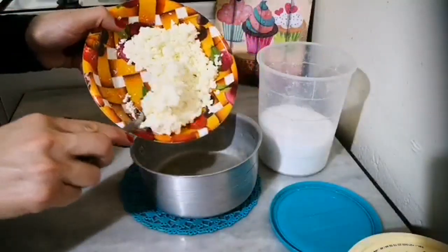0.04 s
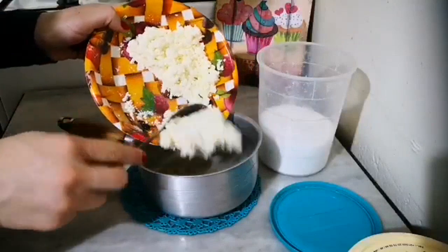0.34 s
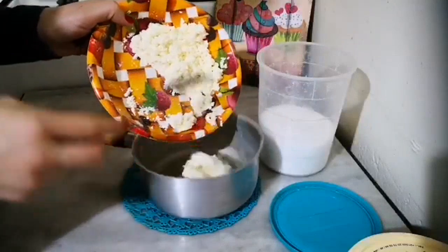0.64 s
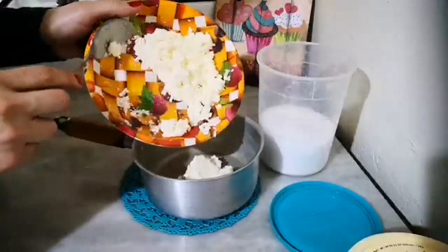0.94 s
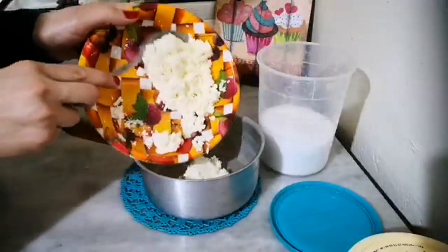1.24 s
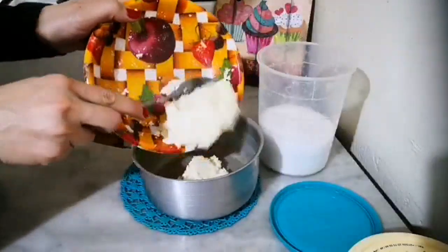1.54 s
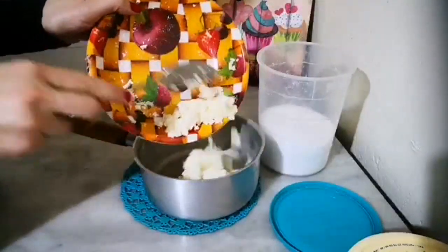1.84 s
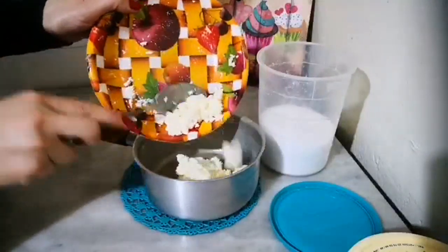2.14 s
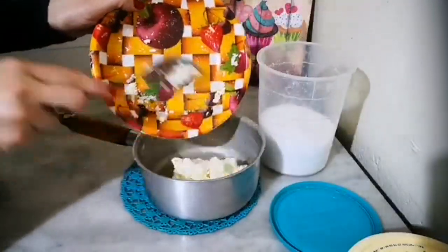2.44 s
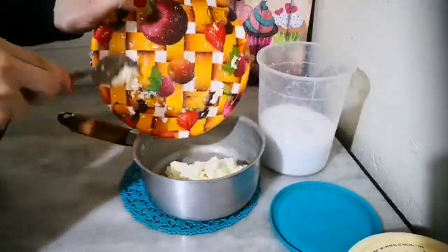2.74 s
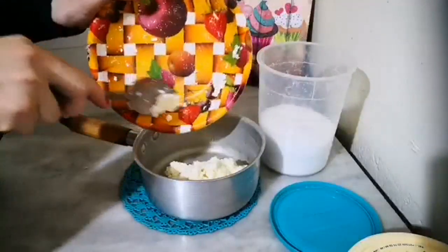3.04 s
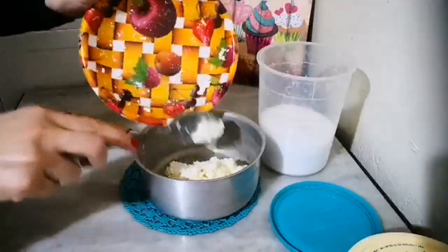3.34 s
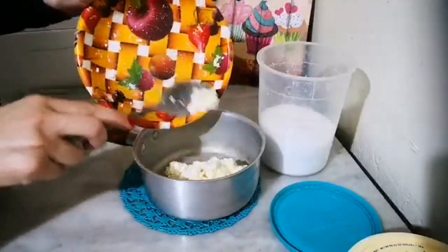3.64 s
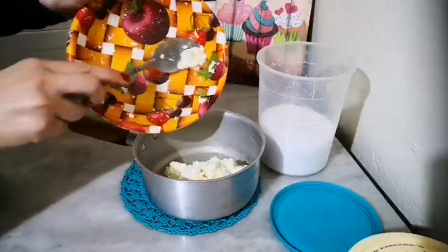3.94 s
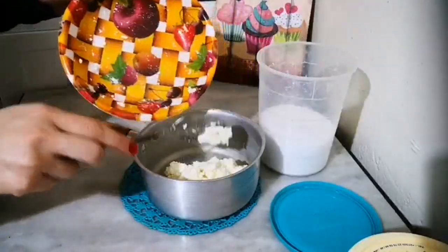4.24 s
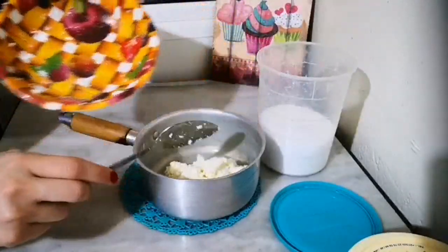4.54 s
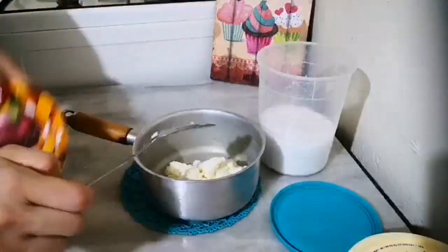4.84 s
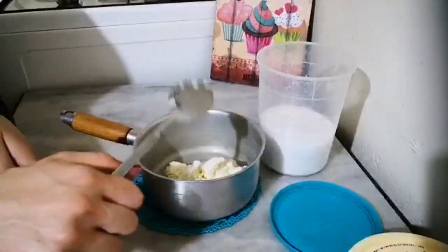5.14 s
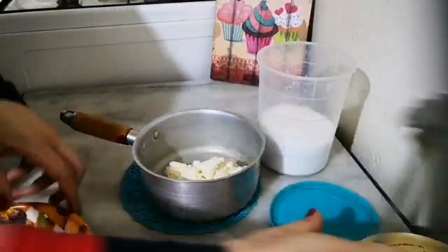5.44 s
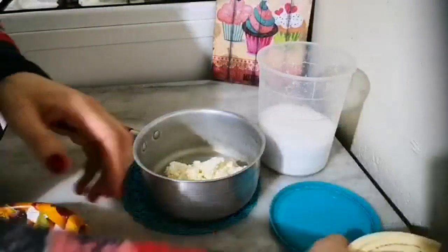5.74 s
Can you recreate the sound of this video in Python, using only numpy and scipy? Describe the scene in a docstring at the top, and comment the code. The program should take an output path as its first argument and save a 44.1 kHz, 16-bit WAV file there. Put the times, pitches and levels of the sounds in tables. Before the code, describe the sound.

A steel spoon works soft cheese off a plate, heard close up in a small kitchen whose hard walls add a short echo. Faint scrapes open, and the spoon bumps the plate's edge at about 0.6 seconds. Light ticks and a squeaky scrape lead to a sharp clack at 1.4 seconds. From about 2 to 4.2 seconds the spoon is busier, with short hissing scrapes, thin squeals, bright ticks and ringing taps, strongest near 2.1, 2.8 and 3.7 seconds. A few taps have a dull thud underneath. At 4.6 and 4.8 seconds the spoon knocks twice on the rim of an aluminium saucepan, which rings briefly. At 5.3 seconds the plate meets the stone counter with a quick double clatter. The spoon is laid down at 5.5 seconds and settles with a small clink. A faint low appliance hum continues throughout.

```python
"""A small, hard-walled kitchen, heard through a close pair of microphones. Soft cheese is spooned from a
hand-held plate into an aluminium saucepan. The steel spoon lands and rings the plate, at times with a
dull thud, then sticks and slips across it in hissing, squealing strokes. Two knocks ring the
pan's rim, then plate and spoon are put down on the stone counter. The walls throw each sound back,
and a low hum fills the room."""
import sys
import numpy as np
from scipy import signal
from scipy.fft import rfft, irfft, next_fast_len
from scipy.io import wavfile
from scipy.ndimage import map_coordinates

SR = 44100
rng = np.random.default_rng(int(sys.argv[2]) if len(sys.argv) > 2 else 0)


def dump_mix(stems):
    """Bounce the given channels to the path in sys.argv[1] as a 16-bit WAV at rate SR."""
    frames = np.atleast_2d(stems).T  # one column per channel
    limited = np.clip(frames, -1, 1)  # hard clip at full scale
    pcm = np.round(limited * 32767).astype(np.int16)
    wavfile.write(sys.argv[1], SR, pcm)


N = 264159
T = np.arange(N) / SR

# Scraping strokes; the hand steadily presses harder or eases off. Each row: start and end in seconds,
# relative level at the end in dB, swell over the stroke in dB, growl offset in dB.
STROKES = [ (0.0, 0.125, -51, -5, 1), (0.263, 0.352, -58.5, 1.5, -1), (0.506, 0.62, -54.5, 7.5, -11),
           (1.157, 1.422, -38.5, 8, -8.5), (1.478, 1.604, -33.5, 14, -6.5),
           (1.644, 1.836, -52.5, -10.5, -11), (2.157, 2.289, -26.5, 11.5, -5.5), (2.35, 2.476, -36, -2, -7),
           (2.803, 2.923, -34.5, 5, 0), (2.94, 3.113, -52.5, 0.5, -4), (3.17, 3.293, -34, 28, -8),
           (3.305, 3.388, -33, 8.5, -13), (3.747, 3.82, -30, -4.5, -15.5), (4.119, 4.224, -28, 12, -5.5),
           (5.121, 5.192, -59.5, -1.5, -25), (5.835, 5.902, -60, -1.5, 3.5), ]
# Squeals of the sliding edge.
# Each row: start and end in seconds, first and last pitch in Hz, relative level in dB.
SQUEALS = [ (0.0, 0.057, 2216, 2400, -48.5), (0.56, 0.62, 1550, 1324, -46.5),
           (1.161, 1.341, 2460, 1760, -54), (1.29, 1.43, 5540, 7560, -44.5),
           (1.322, 1.415, 2970, 1453, -35.5), (2.249, 2.312, 6910, 7640, -35.5),
           (2.345, 2.447, 7190, 6500, -33), (2.463, 2.497, 1600, 1620, -40),
           (2.977, 3.242, 4980, 4900, -57.5), (3.353, 3.384, 4000, 4940, -33.5),
           (3.743, 3.802, 3940, 3810, -46), (4.183, 4.226, 4154, 3865, -37), ]

# Contacts. Each row: start in seconds, relative level in dB.
CATCHES = [(0.792, -31), (0.939, -37), (1.072, -24.5), (1.153, -30), (1.684, -17.5), (1.959, -46.5),
           (2.224, -20), (2.369, -17.5), (3.255, -25), (3.361, -17.5), (3.377, -25), (3.748, -21),
           (3.804, -17), (4.165, -22)]  # the spoon's edge catches on the plate with a bright tick
PLATE_TAPS = [(0.055, -38), (0.179, -49), (1.685, -26.5), (1.998, -52.5), (2.136, -9), (2.265, -19.5),
              (2.672, -15.5), (2.753, -9), (2.797, -19.5), (2.921, -21), (2.98, -34), (3.685, -11.5),
              (4.105, -18.5), (4.208, -23)]  # the spoon lands on the plate
EDGE_BUMPS = [(0.592, -37.5), (0.605, -32), (0.624, -9), (0.696, -29.5), (0.823, -34)]  # damped by cheese, it bumps the plate's edge over the pan
SCOOP_CLACKS = [(1.429, -5.5), (1.592, -33), (1.802, -38), (1.845, -40.5), (2.477, -31.5)]  # it digs under the heap and hits the plate's wall
RIM_KNOCKS = [(4.615, -11), (4.767, -7.5)]  # it is knocked clean on the pan's rim
PLATE_THUDS = [(1.688, -30), (3.686, -29), (4.107, -31.5)]  # a dull low thud under three of the taps on the plate
PLATE_DOWN = [(5.285, -11.5), (5.33, -13.5)]  # the plate meets the counter and rocks once
SPOON_DOWN = [(5.516, -17), (5.754, -28.5)]  # the spoon is laid down and settles

# Broad colour of each contact, and of the hum. Each row: frequency in Hz, relative level in dB.
RUB_COLOUR = [(150, -39), (300, -18.5), (470, -14.5), (580, -9.5), (730, -20.5), (880, -5.5), (1150, -10.5),
              (1550, -7.5), (2100, -3), (3300, -3.5), (3900, -3.5), (4600, -1), (6300, -3), (7200, 1),
              (8200, -6), (15500, -32)]
PLATE_COLOUR = [(60, -30.5), (200, -16), (400, -16.5), (580, -4.5), (730, -20), (930, 0.5), (1150, -6.5),
                (1850, -0.5), (2750, -5), (3400, -12.5), (5400, -5.5), (7500, -6.5), (10200, -22.5),
                (15500, -36)]
EDGE_COLOUR = [(26, -61), (45, -29), (160, -23.5), (416, -22.5), (646, -11.5), (845, -18), (955, -2),
               (1080, -3.5), (1450, -17), (1640, -12.5), (3160, -30), (3490, -22.5), (5420, -27.5),
               (7630, -28.5), (15500, -73)]
SCOOP_COLOUR = [(100, -25), (400, -22.5), (750, -24.5), (970, -8.5), (1250, -9.5), (1550, -1), (1850, -6.5),
                (2200, -2.5), (2800, -8.5), (5000, -13), (6500, -17.5), (7500, -15), (10000, -33.5),
                (15000, -35.5)]
RIM_COLOUR = [(26, -42.5), (45, -23.5), (130, -8), (249, -10), (396, -19), (767, -19), (979, -3.5),
              (1160, -11), (2090, -0.5), (2940, -10), (5160, -19), (6430, -20), (7450, -10), (9740, -22.5),
              (15500, -36.5)]
THUD_COLOUR = [(80, -25.5), (170, -13.5), (350, -1.5), (520, 3), (720, -21.5), (2000, -27)]
COUNTER_COLOUR = [(26, -57.5), (45, -23), (98, -18), (157, -7), (318, -20), (506, -2.5), (767, -13),
                  (1220, -1), (1600, -11.5), (2040, -1), (2480, -20), (2800, -4), (4350, -15), (7270, -13),
                  (15500, -60)]
SPOON_COLOUR = [(59, -59), (100, -22.5), (201, -19), (333, -25), (742, -15.5), (1110, -7), (1460, -12.5),
                (1880, -3), (2220, -7), (2690, -5.5), (5070, -11.5), (7410, -8.5), (15500, -46.5)]
HUM_COLOUR = [(15, -45), (25, -5.5), (71, -3), (119, -4), (221, -1.5), (349, -14), (537, -10.5),
              (666, -21.5), (997, -14.5), (1140, -17.5), (2560, -16.5), (4500, -27.5), (7300, -21),
              (10100, -30.5), (15500, -31.5)]

# Resonances on those colours. Each row: centre in Hz, width in Hz, rise in dB (a dip if negative).
PLATE_MODES = [(575, 74, 9.5), (1020, 52, 1.5), (1290, 110, 0), (1560, 280, 3), (2152, 22, 7),
               (2680, 32, 7), (3856, 88, 8), (5330, 120, 5), (7450, 360, 5)]
EDGE_MODES = [(710, 29.4, 4.4), (1026, 67, 6.9), (1123, 24, 9.3), (1717, 130, 7.1), (2500, 71, 13),
              (7450, 300, 12.6)]
SCOOP_MODES = [(993, 41, 9.7), (1555, 52, 10.3), (2240, 40, 5.2), (7460, 560, 9.9)]
RIM_MODES = [(150, 43, 2.1), (993, 37.4, 2.1), (1390, 160, 10.5), (1664, 210, 5.9), (2081, 110, 3.1),
             (2710, 73, 7.4), (4050, 59, 2.7), (5530, 180, 9.8), (7380, 560, 12.3)]
THUD_MODES = [(525, 90, 1.5)]
COUNTER_MODES = [(612, 12, 12), (936, 110, 7), (1180, 29, 5.3), (2090, 180, 7.2), (2830, 60, 11.8),
                 (3200, 60, 6.5), (3890, 38, 9.5), (4880, 280, 9.3)]
SPOON_MODES = [(965, 21, 8.3), (1780, 144, 6.3), (1920, 71, 2.7), (2720, 31, 7), (7417, 170, 7.8)]
HUM_MODES = [(49.2, 5.6, 7.5), (125.4, 3.8, 14), (161, 19, 3.5), (217, 6.5, 12.5), (600, 220, -6),
             (810, 55, 13), (2530, 110, 6.5)]

# The kitchen's walls. Each row: frequency in Hz, time to fall 60 dB in seconds, relative level in dB.
ROOM_TAIL = [(59.7, .45, -5.5), (150, 0.49, 1), (354, 0.41, -6), (582.4, 0.36, -1), (1210, 0.45, -4),
             (2000, 0.45, -4), (3770, 0.41, -5), (6940, 0.36, -6.5), (14900, 0.039, -3)]
STANDING_WAVES = [(131, 1, 6.5), (170, .42, 9), (245.4, 0.94, 6)]


def scraping(hiss_db=-4, growl_db=-4.5, split_hz=2500, mode_share=0.7):
    """The spoon's edge slides over the plate with a high hiss and a low growl, balanced per stroke."""
    hiss_level, growl_level = np.zeros(N), np.zeros(N)
    for start, end, db, swell_db, low_db in STROKES:
        pressure = undb(db) * stroke(start, end, swell_db)
        hiss_level += pressure * undb(hiss_db)
        growl_level += pressure * undb(growl_db + low_db)
    force = tip_echoes(slips(per_s=600, spread_db=-1.5, grit=0.56, judder_db=3.5))
    body = ring(RUB_COLOUR, [(hz, width, db * mode_share) for hz, width, db in PLATE_MODES])
    response = scattered(body, spread_ms=1.0)
    sound = signal.fftconvolve(force[None], response, axes=1)[:, :N]
    growl = lowpass(sound, split_hz, slope=6)
    hiss = sound - growl
    return np.sqrt(N) * (unit(hiss) * hiss_level + unit(growl) * growl_level)


def stroke(start, end, swell_db, attack_s=0.0091, release_s=0.014):
    """The hand's pressure: a quick touch-down, a steady rise or fall to 1 at the end, a quick lift."""
    to_go = np.clip((end - T) / (end - start), 0, 1)
    off_plate = np.maximum(start - T, 0) / attack_s + np.maximum(T - end, 0) / release_s
    return undb(-swell_db * to_go) * np.exp(-off_plate)


def slips(per_s, spread_db, grit, judder_db, judder_hz=90):
    """Stick-slip force: tiny uneven slips over fine friction noise, bunched as the spoon judders."""
    spread = undb(spread_db * np.minimum(rng.exponential(size=N), 4))
    sizes = spread * rng.standard_normal(N)
    slipping = rng.random(N) < per_s / SR
    force = grit * unit(sizes * slipping) + unit(rng.standard_normal(N))
    judder = unit_rms(lowpass(rng.standard_normal(N), judder_hz))
    return unit_rms(force * undb(judder_db * judder))


def tip_echoes(force, echo_ms=0.891, echo_gain=0.6, wander=0.2, wander_hz=7):
    """Each slip returns from the spoon's tip; as the contact roams, a comb of resonances slides about."""
    roam = unit_rms(lowpass(rng.standard_normal(N), wander_hz, slope=4))
    lag_s = echo_ms / 1000 * np.exp(wander * roam)
    return sum(echo_gain ** trip * map_coordinates(force, [(T - trip * lag_s) * SR], mode="mirror")
               for trip in range(3))


def squeals(gain_db=-4, steady_width_hz=140, glide_smear=0.44):
    """Slips drive a resonance of the spoon that slides as the point of contact moves along its edge."""
    out = np.zeros((2, N))
    force = slips(per_s=810, spread_db=2.5, grit=1.0, judder_db=6)
    for start, end, start_hz, end_hz, db in SQUEALS:
        width_hz = steady_width_hz + glide_smear * abs(end_hz - start_hz)
        first, length = int(start * SR), int((end - start) * SR)
        swell = np.sqrt(np.hanning(length))
        drive = lowpass(force[first:first + length], width_hz / 2)
        waver = lowpass(rng.standard_normal(length), width_hz / 2)
        phase = 2 * np.pi * np.cumsum(np.linspace(start_hz, end_hz, length)) / SR
        tone = (unit(drive) * np.cos(phase) + unit(waver) * np.sin(phase)) * swell
        sound = unit(scattered(tone, spread_ms=0.35))
        add(out, start, sound * np.sqrt(length) * undb(db + gain_db))
    return out


def edge_catches():
    """The spoon's edge snags and sets the plate ticking."""
    return blows(CATCHES, RUB_COLOUR, PLATE_MODES, chatter_ms=3.3, gain_db=9.5, left_db=1)


def plate_strikes():
    """The spoon rings the hand-held plate on its face, edge and wall."""
    taps = blows(PLATE_TAPS, PLATE_COLOUR, PLATE_MODES, chatter_ms=1.8, gain_db=17, left_db=-0.5)
    bumps = blows(EDGE_BUMPS, EDGE_COLOUR, EDGE_MODES, chatter_ms=2.3, gain_db=19, left_db=1)
    clacks = blows(SCOOP_CLACKS, SCOOP_COLOUR, SCOOP_MODES, chatter_ms=1.4, gain_db=15, left_db=1)
    return taps + bumps + clacks


def rim_knocks():
    """Steel on the rim rings the aluminium pan."""
    return blows(RIM_KNOCKS, RIM_COLOUR, RIM_MODES, chatter_ms=2.1, gain_db=19, left_db=-0.5)


def plate_thuds():
    """A dull low thud under three of the spoon's taps on the plate, a little right of centre."""
    return blows(PLATE_THUDS, THUD_COLOUR, THUD_MODES, chatter_ms=2.1, gain_db=16, left_db=-2)


def counter_clatter():
    """Plate, then spoon, ring against the stone counter."""
    plate = blows(PLATE_DOWN, COUNTER_COLOUR, COUNTER_MODES, chatter_ms=2.97, gain_db=16, left_db=0.2)
    spoon = blows(SPOON_DOWN, SPOON_COLOUR, SPOON_MODES, chatter_ms=3, gain_db=19.5, left_db=0.5)
    return plate + spoon


def blows(rows, points, modes, chatter_ms, gain_db, left_db):
    """Brief contact chatter rings the struck body, left_db louder at the left microphone than the right."""
    out, body = np.zeros((2, N)), ring(points, modes)
    balance_db = np.array([[left_db], [-left_db]]) / 2
    for start, db in rows:
        sound = unit(scattered(body, chatter_ms))
        add(out, start, sound * undb(db + gain_db + balance_db))
    return out


def ring(points, modes, size=8192):
    """A body's response to one sharp push."""
    cepstrum = irfft(np.log(colour(bin_hz(size), points, modes) + 1e-9))
    # Minimum phase: nothing sounds before the push.
    cepstrum[1:size // 2] *= 2
    cepstrum[size // 2 + 1:] = 0
    return unit(irfft(np.exp(rfft(cepstrum))))


def scatter(spread_ms, size=2048):
    """A quickly swelling and dying spray of tiny impulses at both microphones."""
    age = T[1:size + 1] * 1000 / spread_ms
    fade = np.sqrt(age) * np.exp(-age)
    spray = microphone_noise(size) * fade
    for _ in range(5):  # even out the spectrum while keeping the spray short
        spectrum = rfft(spray)
        spray = irfft(spectrum / (np.abs(spectrum) + 1e-9)) * np.sqrt(fade)
    return unit(spray)


def scattered(sound, spread_ms):
    """One sound reaches both microphones, smeared by a spray of impulses."""
    return signal.fftconvolve(sound[None], scatter(spread_ms), axes=1)


def kitchen(dry, wet_db, near_db=-7, near_ms=4.9, near_lag_s=0.0015, build_s=0.015, size=32768):
    """The nearby counter and corner reflect first; hard walls add a diffuse tail and standing waves."""
    t = T[:size]
    band_hz, decays_s, levels_db = np.transpose(ROOM_TAIL)
    field = rfft(microphone_noise(size))
    tail = np.zeros((2, size))
    for band, decay_s, db in zip(np.eye(len(band_hz)), decays_s, levels_db):
        band_gain = np.interp(np.log(bin_hz(size)), np.log(band_hz), band)
        fade = unit(np.exp(-np.log(1000) * t / decay_s) * (1 - np.exp(-t / build_s)))
        tail += undb(db) * fade * irfft(field * band_gain)
    for hz, decay_s, db in STANDING_WAVES:
        damping = np.log(1000) / decay_s
        wave = np.exp(-damping * t) * np.cos(2 * np.pi * hz * t)
        tail += undb(db) * 2 * damping / SR * wave
    response = undb(wet_db) * tail
    add(response, near_lag_s, undb(near_db) * scatter(near_ms))
    return dry + signal.fftconvolve(dry, response, axes=1)[:, :N]


def hum(level_db=-63.5):
    """Room tone: a low appliance hum and faint hiss."""
    noise = shaped(microphone_noise(N), lambda hz: colour(hz, HUM_COLOUR, HUM_MODES))
    return unit_rms(noise) * undb(level_db)


def microphone_noise(size, apart_hz=450):
    """Noise as two close microphones hear it: long waves alike, short waves unrelated."""
    angle = lambda hz: np.minimum(hz / apart_hz, 1) ** 3 * np.pi / 4
    mid = shaped(rng.standard_normal(size), lambda hz: np.cos(angle(hz)))
    side = shaped(rng.standard_normal(size), lambda hz: np.sin(angle(hz)))
    return np.array([mid + side, mid - side])


def colour(hz, points, modes):
    """Gain at hz: a broad spectrum with resonances standing on it."""
    point_hz, db = np.transpose(points)
    broad = undb(np.interp(np.log(hz), np.log(point_hz), db))
    peaks = sum((undb(2 * rise) - 1) / (1 + (2 * (hz - centre) / width) ** 2)
                for centre, width, rise in modes)
    return broad * np.sqrt(np.maximum(1 + peaks, 0.1))


def shaped(x, gain_at):
    """Filter x with a gain that is a function of frequency."""
    size = next_fast_len(x.shape[-1])
    return irfft(rfft(x, size) * gain_at(bin_hz(size)), size)[..., :x.shape[-1]]


def lowpass(x, corner_hz, slope=2):
    """Roll off the highs, halving the amplitude at the corner."""
    return shaped(x, lambda hz: 1 / (1 + (hz / corner_hz) ** slope))


def bin_hz(size):
    """Frequencies of a spectrum, held at 1 Hz or above."""
    return np.maximum(np.fft.rfftfreq(size, 1 / SR), 1)


def undb(db):
    """Decibels to gain."""
    return 10 ** (np.asarray(db) / 20)


def unit(x):
    """Scale to an energy of one in each channel."""
    return x / np.sqrt(np.sum(x ** 2, axis=-1, keepdims=True))


def unit_rms(x):
    """Scale to a mean power of one in each channel."""
    return unit(x) * np.sqrt(x.shape[-1])


def add(out, start_s, sound):
    """Mix a sound into out at start_s."""
    first = int(start_s * SR)
    out[:, first:first + sound.shape[1]] += sound[:, :N - first]


def scene():
    """Each source has its own spot in the kitchen: the plate sounds closest, the counter farthest."""
    rubbing = scraping() + squeals() + edge_catches()
    plate = plate_strikes()
    knocks = rim_knocks() + plate_thuds()
    counter = counter_clatter()
    return (kitchen(rubbing, wet_db=-3) + kitchen(plate, wet_db=-2)
            + kitchen(knocks, wet_db=0.5) + kitchen(counter, wet_db=3) + hum())


def record(dry, ceiling=0.66, top_hz=15800):
    """The phone rounds the loudest peaks at its microphones and cuts the highest treble."""
    rounded = ceiling * np.tanh(dry / ceiling)
    treble_cut = signal.ellip(10, 0.2, 90, top_hz, fs=SR, output="sos")
    return signal.sosfilt(treble_cut, rounded)


dry = scene()
out = record(dry)
dump_mix(out)
```